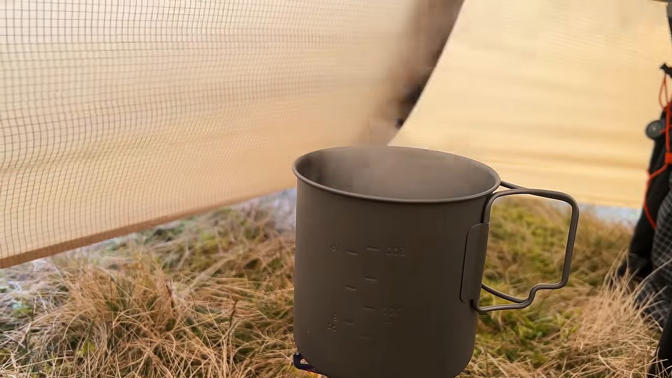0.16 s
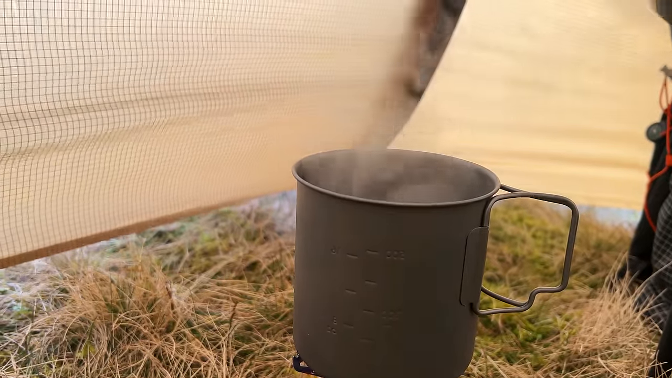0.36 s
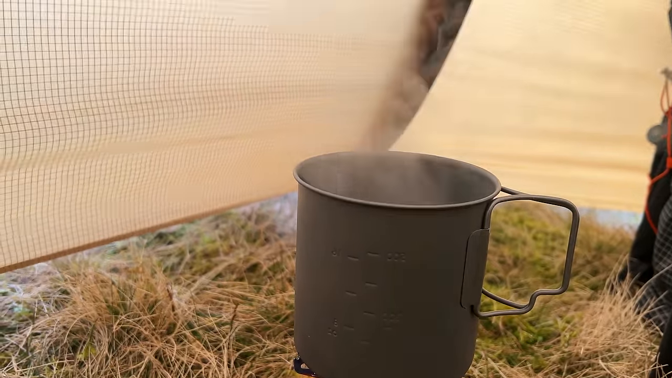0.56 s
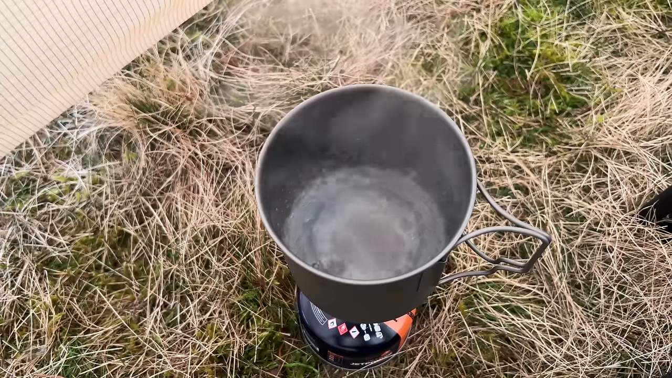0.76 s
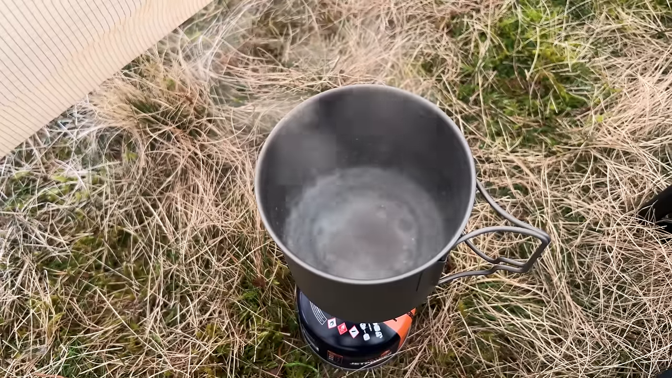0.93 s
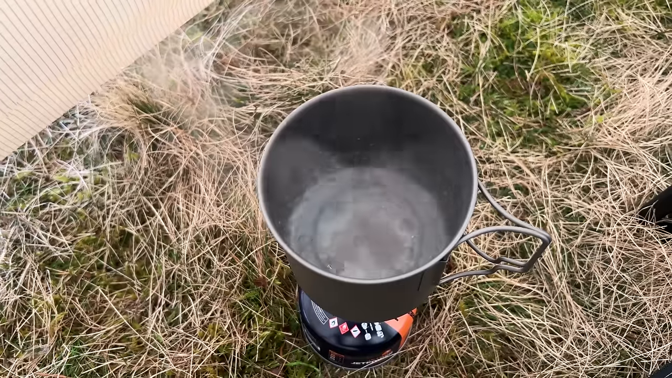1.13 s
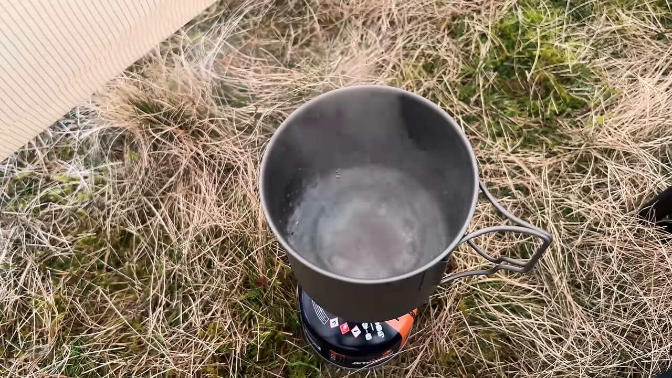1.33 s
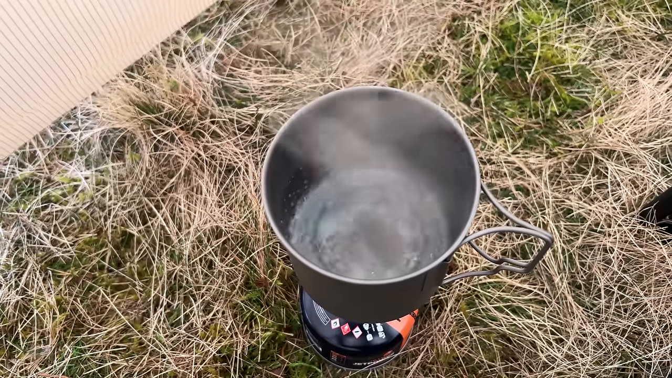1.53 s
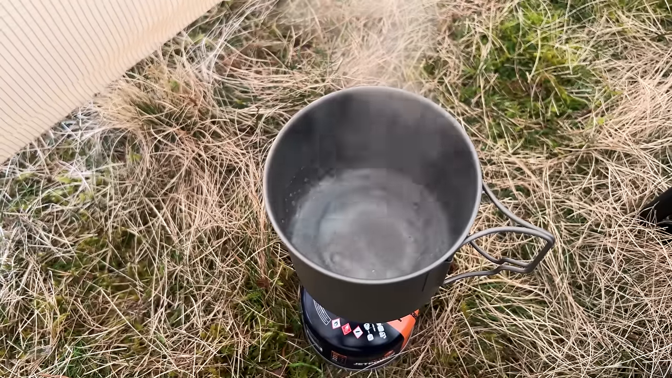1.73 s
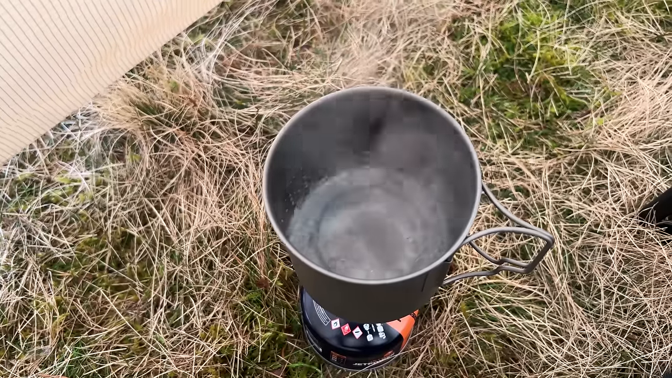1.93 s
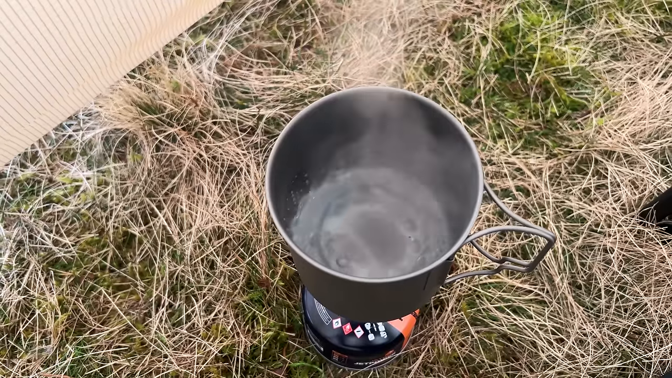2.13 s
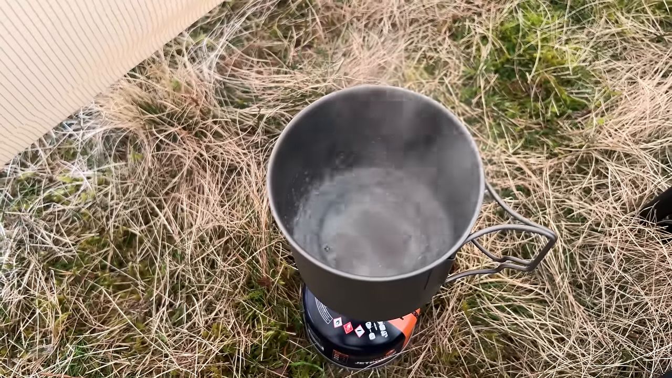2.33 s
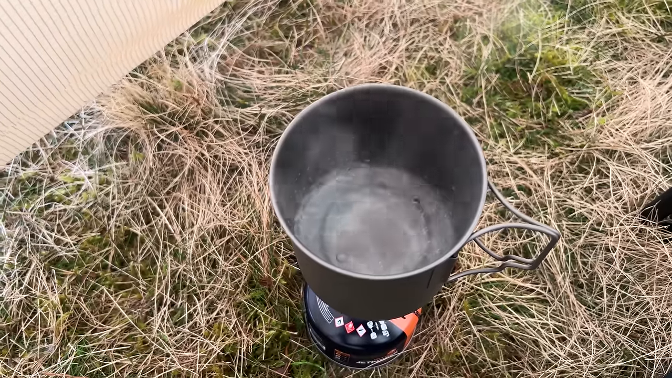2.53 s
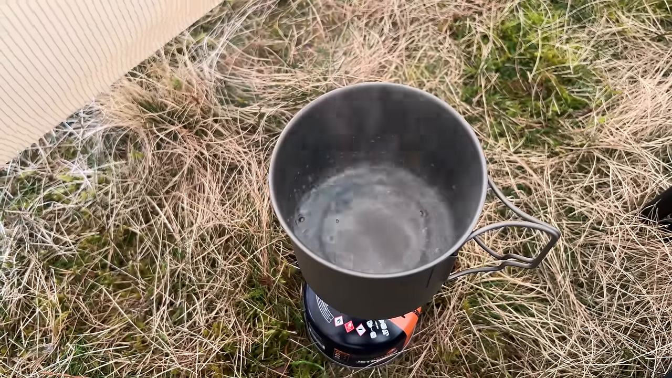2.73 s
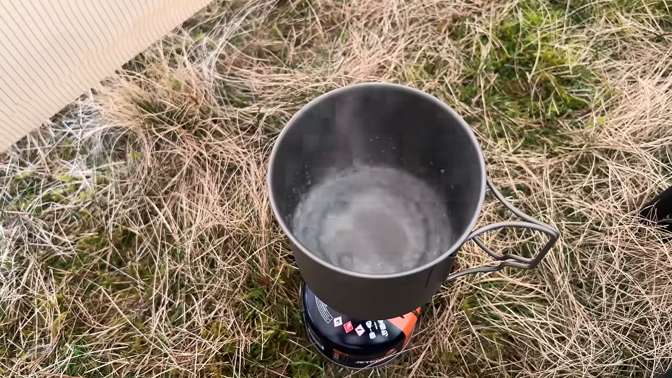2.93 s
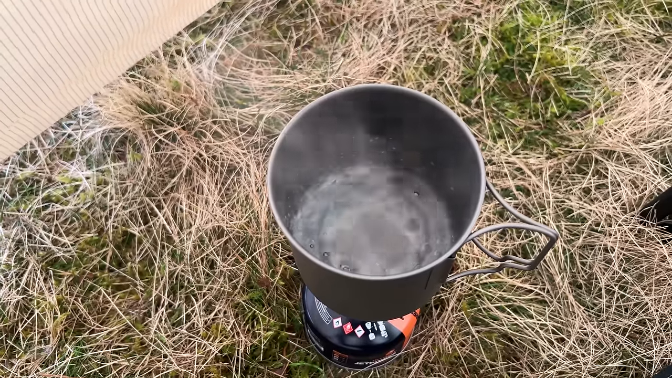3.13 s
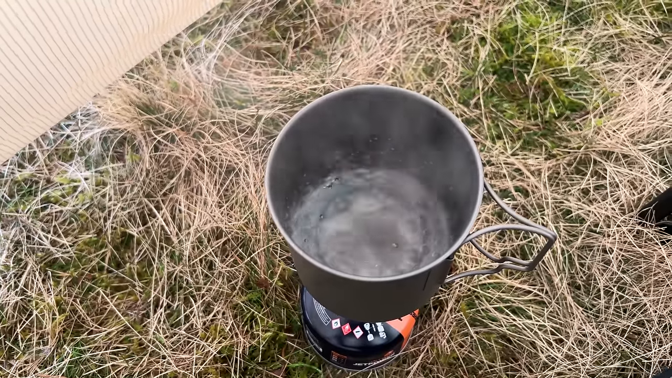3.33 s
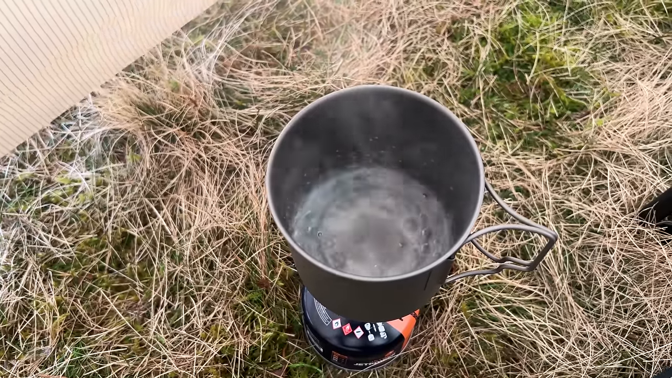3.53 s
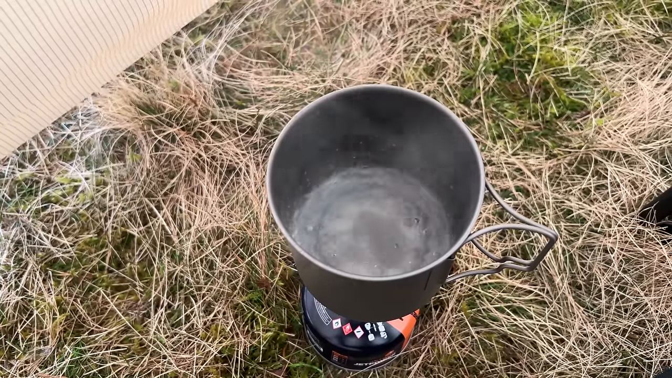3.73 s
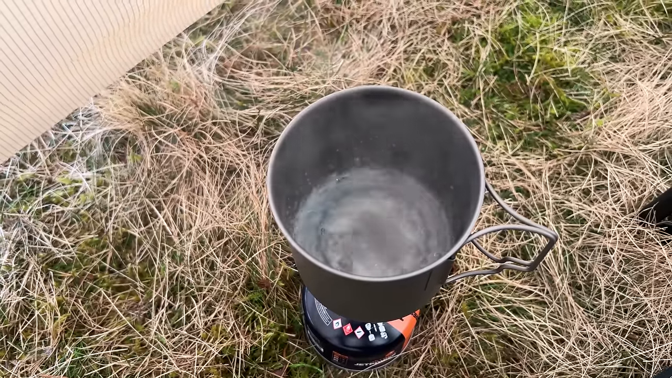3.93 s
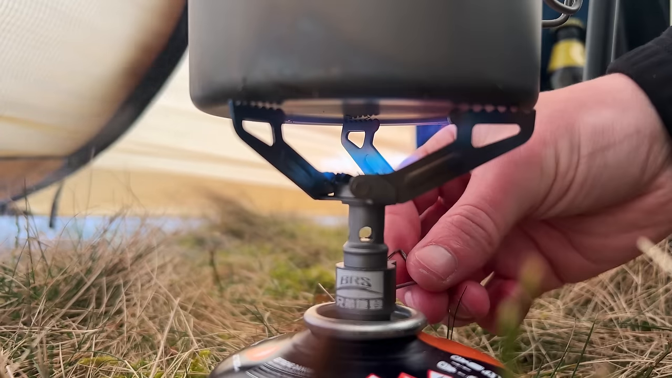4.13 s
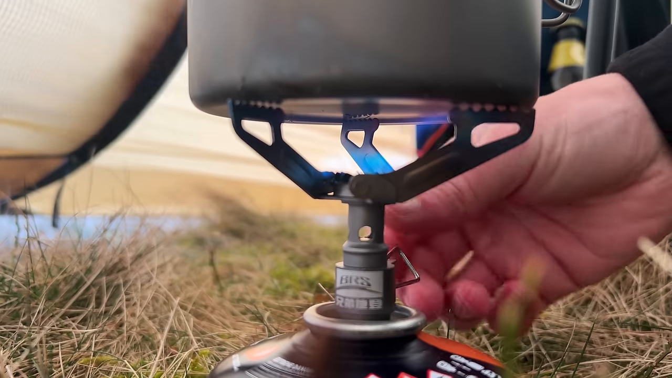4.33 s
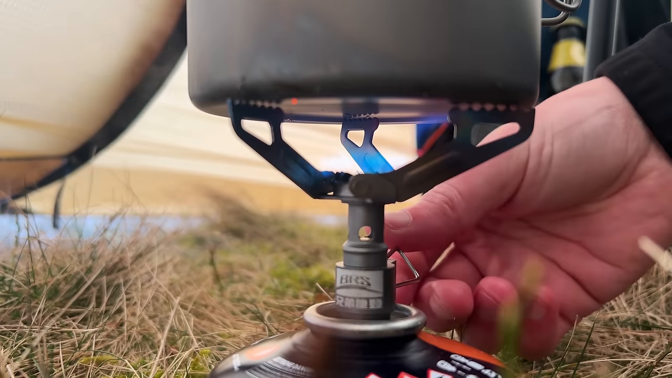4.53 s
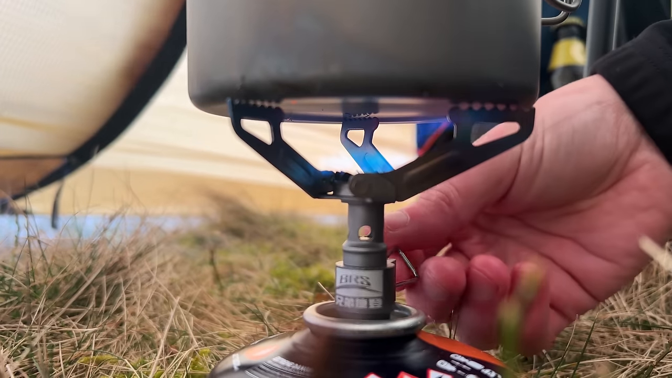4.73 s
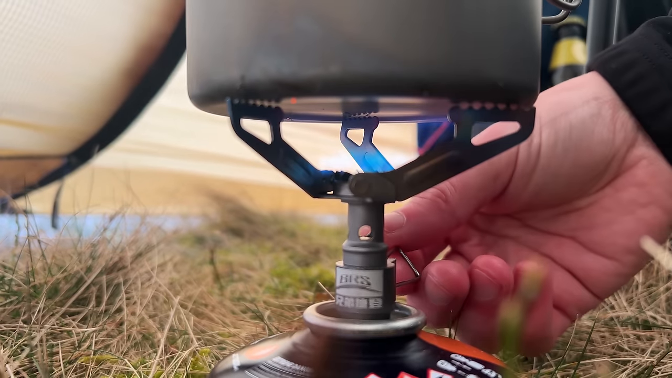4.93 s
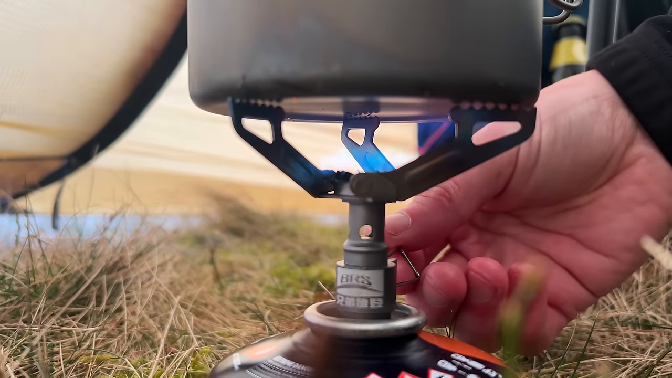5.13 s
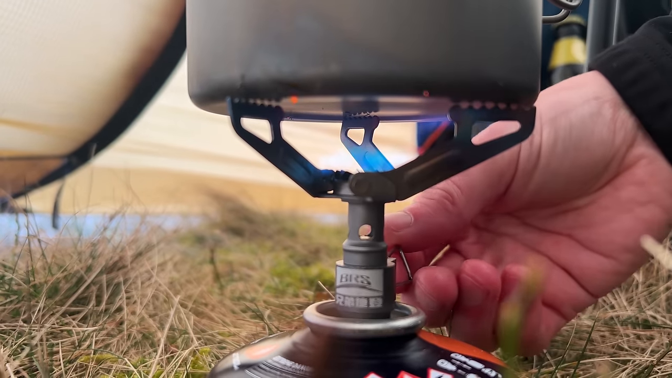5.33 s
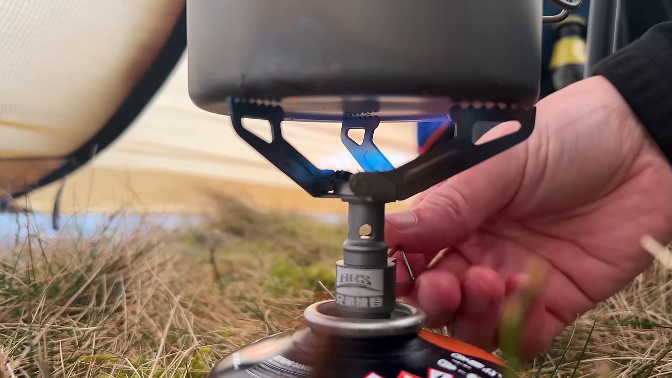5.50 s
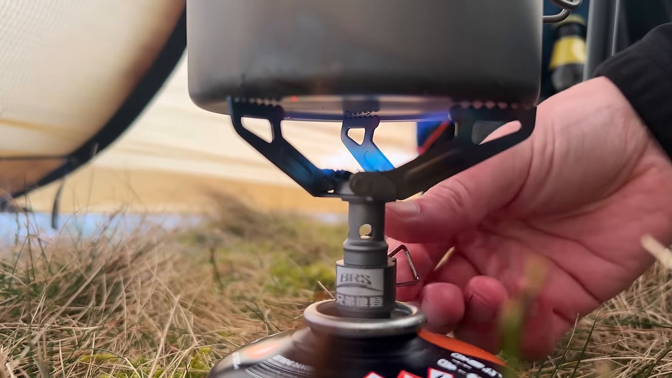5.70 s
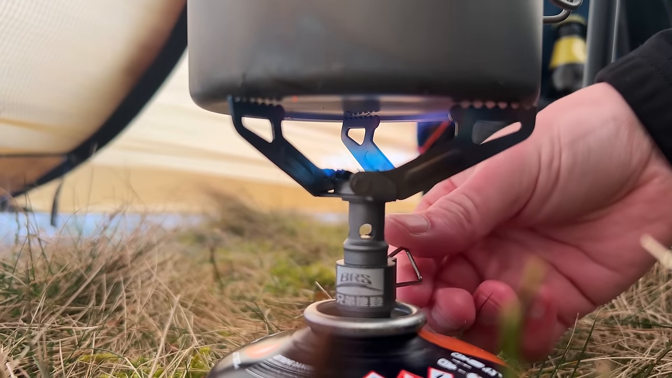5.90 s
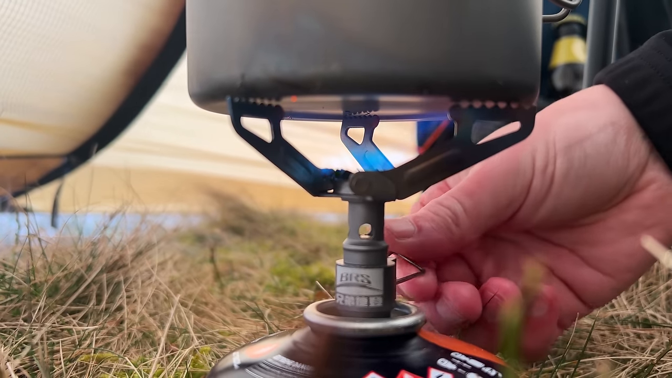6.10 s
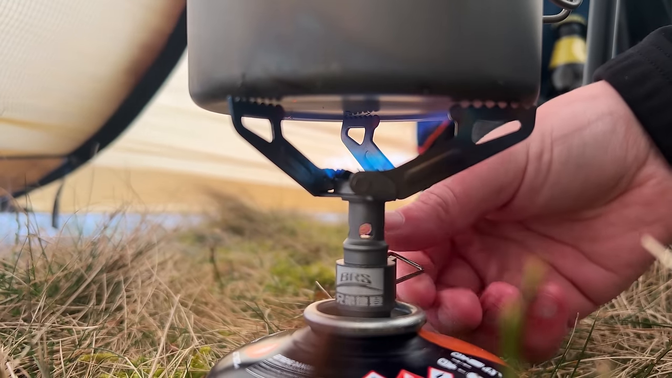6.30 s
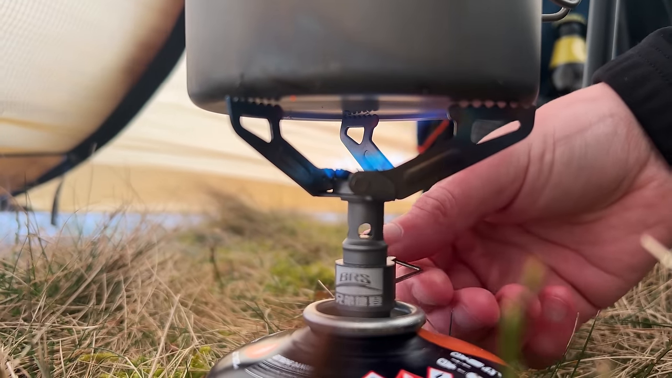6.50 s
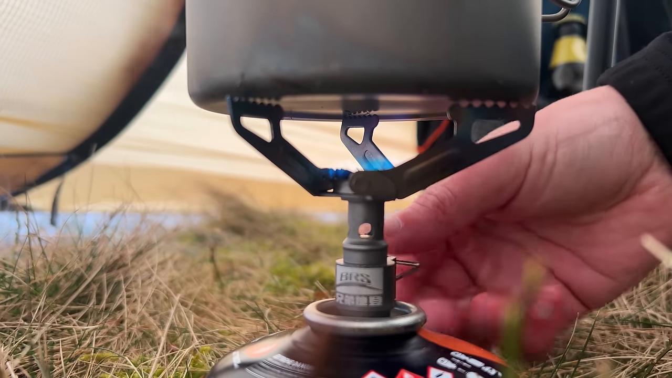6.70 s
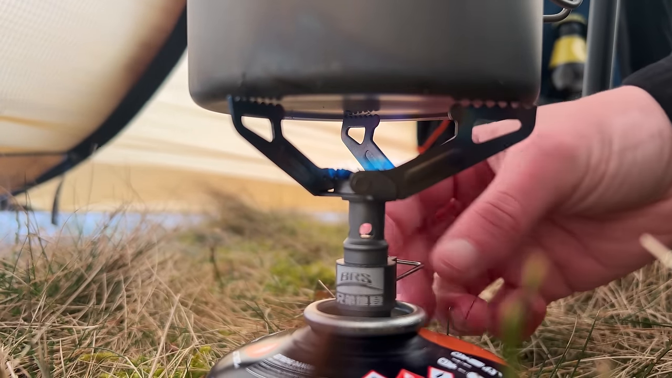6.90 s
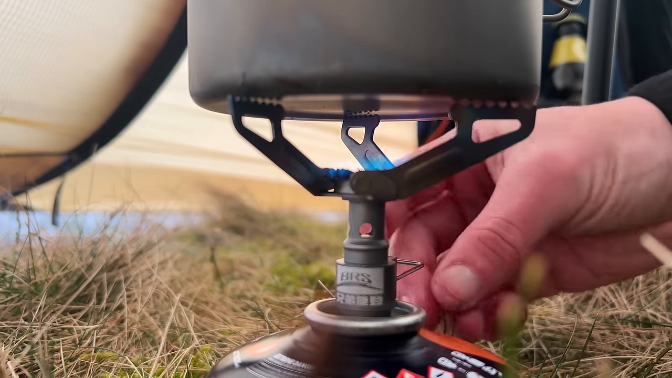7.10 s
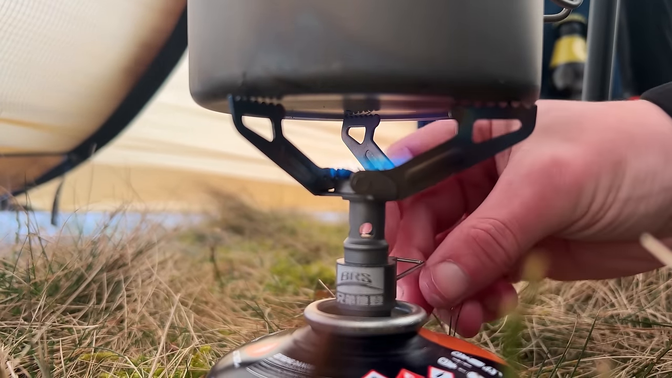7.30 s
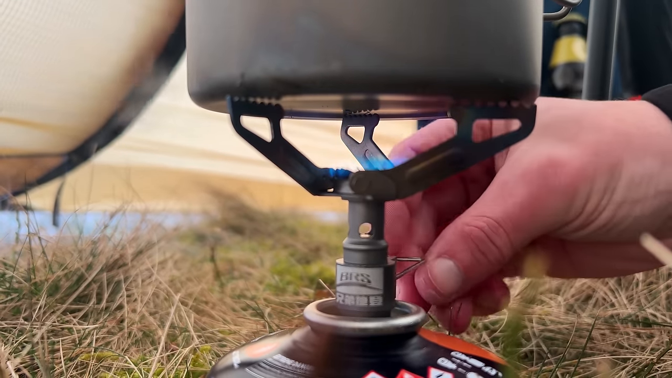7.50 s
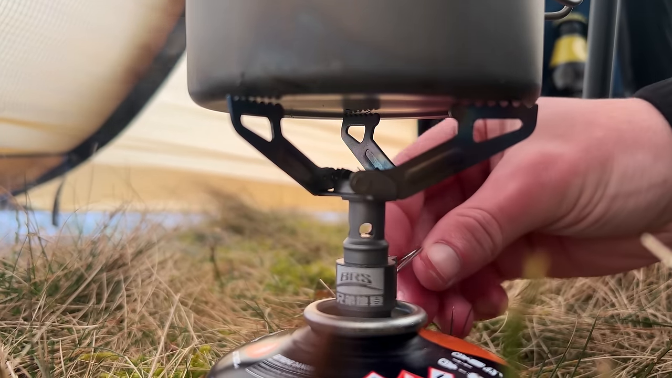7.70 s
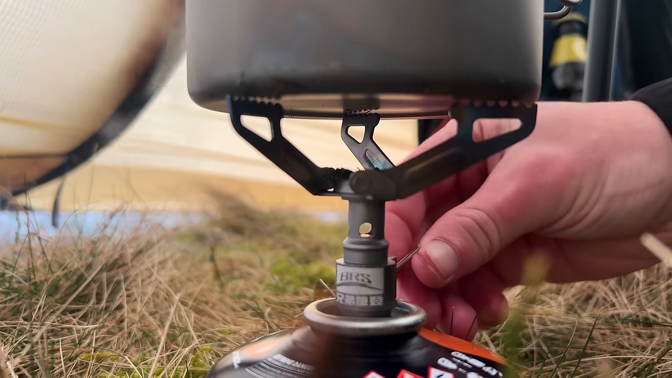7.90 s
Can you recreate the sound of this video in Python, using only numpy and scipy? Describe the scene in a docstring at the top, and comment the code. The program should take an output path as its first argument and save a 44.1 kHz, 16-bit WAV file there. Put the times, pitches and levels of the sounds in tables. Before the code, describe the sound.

A small gas stove burns outdoors, heard close in stereo with light, low wind behind. From 0 to about 0.5 s it is a steady soft roar with bright gas hiss beside a metal mug. By about 1 s the sound blends to above the mug: a hollow, resonant roar, less hiss, and a fine high sizzle of simmering bubbles that swells and ebbs until about 4 s. A faint tick comes near 4.2 s as the burner moves close; by 4.6 s the roar is louder and fuller, with short uneven low swells up to 5.7 s. Around 6.2 s the flame drops a step, and at 6.6 s falls sharply to a dull quiet rumble with thin hiss. From 7.3 s small metallic handle ticks and scrapes appear. At 7.6 s it sinks again, throbbing and puffing weakly, nearly out but still hissing at the end.

```python
"""Small gas stove under a mug

Outdoors, at three places in turn, each fading into the next: beside the mug, above its mouth, close to the burner.
The flame is coloured noise with short uneven swells; the gas jet hisses, the mug's hollow colours the roar.
Bubbles of the simmering water ring narrow bands, heard from above. A hand turns the flame down
until it throbs and nearly dies; the wire valve handle ticks in short noise bursts. Light wind lies behind.
"""
import sys
import numpy as np
from scipy import signal
from scipy.fft import rfft, irfft
from scipy.io import wavfile
from scipy.ndimage import uniform_filter1d

SR = 44100
rng = np.random.default_rng(int(sys.argv[2]) if len(sys.argv) > 2 else 0)


def generate_wav(signal):
    """Clip the signal to [-1, 1] and save it as 16-bit WAV at the path in sys.argv[1]."""
    frames = np.transpose(np.atleast_2d(signal))
    scaled = np.clip(frames, -1, 1) * 32767
    pcm = np.round(scaled).astype(np.int16)
    wavfile.write(sys.argv[1], SR, pcm)


N = 350578
SIZE = 1024  # samples in a spectral frame
HOP = SIZE // 4
HZ = np.fft.rfftfreq(SIZE, 1 / SR)
FRAME_S = np.arange(N // HOP + 5) * HOP / SR
T = np.arange(N) / SR

# listening place, crossfaded from one to the next:
# (time [s], place [0 beside the mug, 1 above its mouth, 2 close to the burner])
LISTENING_PLACE = [(0.25, 0), (0.7, 0.56), (1.1, 1.08), (1.5, 1.04), (3.8, 1.06), (4.17, 1.51),
                   (4.28, 1.82), (4.58, 2.12)]
# roar spectrum at each place, and of the low flame: (frequency [Hz], relative density [dB per Hz])
ROAR_BESIDE = [(25, -34), (55, -2.5), (130, -3), (300, -3), (700, -10.5), (980, -21), (1350, -14),
               (1800, -13.5), (2500, -22), (2900, -34), (9000, -62)]
ROAR_ABOVE = [(25, -33), (55, 6.5), (100, -2.5), (230, 1.5), (320, -3), (450, -6.5), (800, -13.5),
              (1570, -21), (2450, -26.5), (9000, -101)]
ROAR_CLOSE = [(25, -27), (50, -13), (90, 0), (330, 0.5), (720, -3.5), (950, -11), (1350, -13), (1780, -24),
              (2150, -21), (2420, -17), (3000, -25.5), (9000, -90)]
ROAR_LOW = [(25, 9.5), (50, 2.5), (130, 3), (300, -2.5), (550, -8.5), (900, -20), (1380, -18), (1590, -21),
            (1760, -40), (2400, -26), (9000, -85.5)]
# jet spectrum at each place, and with the valve nearly shut: (frequency [Hz], relative density [dB per Hz])
HISS_BESIDE = [(2000, -30.0), (3200, 1.5), (4200, 0.5), (5500, -0.5), (7300, 1.5), (8400, 3.5), (10000, -7),
               (11200, -14), (12500, -17), (15500, -17)]
HISS_ABOVE = [(2100, -27), (2500, -14), (2850, 0.0), (3500, -1.4), (3900, -6.5), (4300, -5.5), (4800, -8.5),
              (5300, -4.4), (5750, -6.8), (7600, -6.3), (8800, -4), (9300, -6), (9900, -13), (11200, -12.8),
              (12500, -21.1), (14000, -20.6), (15500, -16.7)]
HISS_CLOSE = [(2100, -26.8), (2900, -7.5), (3300, -4.3), (3700, -4), (4200, -4.8), (5800, -5.6),
              (7200, -1.6), (8000, -0.8), (8600, 0.6), (9600, -1.4), (10300, -8.5), (11500, -5.8),
              (12900, -14.0), (14500, -10.3), (15600, -13.9)]
HISS_LOW = [(2100, -25.0), (3000, -1.5), (4550, -6), (4850, 0), (5150, -4.8), (6250, -2.5), (6550, 0.3),
            (6850, -3), (8100, 1.2), (9600, 1.5), (10300, -6), (11400, -5), (12600, -11), (14400, -1.5),
            (15600, -2)]
# the two microphone ports at each place:
# (frequency [Hz], left over right [dB], coherence [0-1], left lead [rad])
PORTS_BESIDE = [(150, 0.9, 0.991, 0.1), (750, 5.3, 0.96, 0.1), (1000, -0.5, 0.91, 0.4),
                (1600, 6.7, 0.9, 0.3), (2450, -4.4, 0.85, 1.1), (3200, 1.2, 0.81, 1.5),
                (4100, 5.6, 0.59, 1.2), (5500, 5.0, 0.45, 2.4), (7300, 4.2, 0.6, 1.5),
                (8700, -1.9, 0.43, -0.5)]
PORTS_ABOVE = [(150, 1.3, 0.994, 0.05), (450, 0.5, 0.989, 0.1), (850, 1.6, 0.979, -0.19),
               (1100, -0.6, 0.99, -0.26), (1330, -0.2, 0.97, -0.51), (1510, -6.7, 0.72, -0.5),
               (1680, 3.0, 0.81, 1.09), (1920, -4.1, 0.95, 0.8), (2200, -2, 0.73, 0.8),
               (2400, -2, 0.61, 1.8), (2650, 1, 0.55, 1.0), (2900, -2, 0.8, 1.1), (3300, 1, 0.85, 0.7),
               (3900, 0, 0.42, -0.2), (4300, 2, 0.61, -0.7), (4800, 5, 0.35, -3.4), (5300, 8, 0.7, -3.1),
               (5800, 8, 0.38, -5.4), (7300, 2.4, 0.4, -4.1), (8700, -2.9, 0.7, -6.4)]
PORTS_CLOSE = [(170, 1.2, 0.995, 0.17), (350, 2.8, 0.975, 0.52), (550, 5.7, 0.995, 0.01),
               (1200, 2.8, 0.982, 0.07), (1620, 11.6, 0.58, 1.89), (2000, 0.4, 0.83, 0.5),
               (2200, 2, 0.89, 2.0), (2450, 1, 0.92, 2.0), (2650, -2, 0.9, 2.6), (2850, 0, 0.93, 3.2),
               (3050, 1.5, 0.82, 3.5), (3300, 3.6, 0.56, 4.9), (3900, 8.1, 0.39, 6.88),
               (5100, 2.0, 0.71, 6.38), (6300, -1.6, 0.64, 6.34), (7400, -0.9, 0.71, 6.49),
               (8500, -7.0, 0.26, 8.71)]
# strength of the flame, nudged up and then turned down by hand: (time [s], strength against normal [dB])
FLAME_STRENGTH = [(0.3, -1), (0.48, -2.5), (0.82, -2.5), (1.3, 0.5), (3.35, 0.3), (3.92, -2.5), (4.7, 0.5),
                  (5.07, 0), (5.16, 1), (5.7, 1.5), (6.16, -0.3), (6.24, -5), (6.555, -5), (6.645, -13.5),
                  (7.0, -15), (7.3, -14), (7.57, -15), (7.63, -22.5), (7.76, -25), (7.93, -21.5)]
# short uneven swells of the roar, and puffs as it starves: (middle [s], length [s], level [dB], pitch [Hz])
ROAR_SWELLS = [(0.137, 0.1, -30.5, 106), (0.22, 0.11, -36, 486), (0.295, 0.046, -29.5, 203),
               (0.48, .07, -30.5, 280), (1.115, 0.11, -36, 104), (1.376, 0.13, -35, 120),
               (1.716, 0.077, -34, 130), (2.658, .07, -33.5, 1080), (3.015, 0.066, -42, 140),
               (3.293, 0.063, -28.5, 85), (4.7, 0.11, -27.5, 110), (5.19, 0.088, -28, 99),
               (5.295, 0.24, -29, 332), (5.533, 0.13, -30, 90), (6.5, .08, -38, 90),
               (7.242, 0.053, -35.5, 243), (7.552, 0.027, -41, 200), (7.65, 0.032, -47, 550),
               (7.715, 0.0079, -44, 480), (7.718, .025, -43, 90), (7.777, 0.012, -38.5, 95),
               (7.832, 0.018, -38.5, 110), (7.884, .03, -40, 85)]
# jet hiss with a normal flame: (time [s], level [dB])
JET_LEVEL = [(0.3, -41), (2.0, -43.5), (4.15, -42), (4.42, -42.5), (4.75, -38), (5.4, -37.5), (5.7, -40.5),
             (5.95, -38), (6.9, -37), (7.35, -33), (7.55, -38), (7.7, -32)]
# lift of the sharp top of the hiss: (time [s], lift [dB])
HISS_SHARPNESS = [(2.8, -3.5), (4.1, 1), (4.3, -2), (4.56, -8), (4.78, -1), (5.45, 0.5), (5.72, -7),
                  (6.3, -2)]
# one reflection off mug or ground, beside the mug then above it: (extra path [m], share of amplitude [0-1])
NEAR_REFLECTIONS = [(0.417, 0.23), (0.307, 0.058)]
# distance of the reflection off the moving hand, at the burner: (time [s], extra path [m])
HAND_PATH = [(4.25, 0.32), (4.7, 0.27), (5.5, 0.26), (5.85, 0.279), (6.55, 0.268), (6.8, 0.31)]
# air resonances of the mug: (frequency [Hz], half-power width [Hz], relative level [dB])
MUG_MODES = [(1128, 260, 2), (1348, 154, -2), (1756, 115, -5.5), (1897, 240, -2), (2910, 380, -18)]
# surges of bubbles: (middle [s], half length [s], level above the mouth [dB], pitch [Hz])
SIMMER_SURGES = [(1.2, 0.65, -46.5, 6580), (1.84, 0.38, -45.5, 6350), (2.518, .25, -49, 6400),
                 (3.06, 0.45, -43.5, 6680), (3.58, 0.25, -48, 6350), (3.88, 0.35, -47, 6480)]
# modes of the mug's base: (frequency [Hz], half-power width [Hz], relative level [dB], left over right [dB])
BASE_MODES = [(3345, 230, 0, -1), (4340, 200, -7, -4), (5330, 300, -3, 7)]
# soft ticks and scrapes of the handle:
# (time [s], level before the port gains [dB], pitch [Hz], width [octaves], decay by 60 dB [s])
HANDLE_TICKS = [(4.168, -40, 3900, 0.35, .04), (7.278, -46, 5400, .16, .04), (7.344, -52, 5300, .45, .1),
                (7.367, -54, 3200, .7, .05), (7.425, -51, 6700, .25, 0.092), (7.483, -43, 3400, 0.67, 0.03),
                (7.698, -50, 4600, 0.91, 0.042), (7.711, -52, 4500, 1, .035), (7.725, -54, 6400, .25, .07),
                (7.824, -53, 5800, .25, 0.056), (7.900, -55, 2900, .8, .08)]
# spectrum of open air and light wind: (frequency [Hz], relative density [dB per Hz])
AIR_SPECTRUM = [(20, -29), (55, -1.5), (110, 0.5), (300, -19), (550, -8), (950, -16), (1400, -11.5),
                (1900, -19.5), (4000, -28), (8000, -25), (11000, -56), (16000, -41)]
# level of the open air, which lulls at the end: (time [s], level [dB])
BREEZE_LEVEL = [(7.3, -47), (7.66, -47.5), (7.9, -52)]

ROAR_DB = (-26.96, -28.46, -21.96)  # normal flame: beside the mug, above it, at the burner
MUG_DB = -32  # over the mouth, with a normal flame
SIMMER_DB = -50  # above the mouth, between the surges
ROAR_FOLLOWS, JET_FOLLOWS, MUG_FOLLOWS = 0.88, 1.32, 0.84  # dB of rise for one dB of flame
DULL_DB = (-4, -16.5)  # flame strength where its colour starts to dull, and is fully dull
STARVED_DB = (-18, -21)  # flame strength where it starts to throb, and throbs fully
HAND_SHARE = 0.21  # amplitude of the hand's reflection against the direct hiss
SHARP_HZ, SHARP_WIDTH_HZ = 9000, 1000
BUBBLES_PER_S, BUBBLE_SPREAD_DB = 3000, 2.2  # so many, so alike, that they merge into a sizzle
TICK_TOP_HZ = 8000
EDGE_HZ = 15800  # upper band limit of the microphone


def flame(ports, flutter, flutter_db=0.5, puff_db=3.0, sway_db=0.21, patchy_db=1.0,
          throb_hz=80, throb_width_hz=45, throb_db=8):
    """Turbulent burning: a low, swaying roar that dulls as the valve closes, and throbs when starved of gas."""
    colour_db = colour(ROAR_BESIDE, ROAR_ABOVE, ROAR_CLOSE, ROAR_LOW)
    colour_db = colour_db + patchy_db * patches(size=8, count=8)
    throb_band = np.exp(-((HZ - throb_hz) / throb_width_hz) ** 2)
    throb = sunk(FRAME_S, STARVED_DB)[:, None] * throb_band
    roar = turbulence(colour_db + throb_db * throb, *ports)
    flutter_depth_db = flutter_db + puff_db * sunk(T, STARVED_DB)
    unrest_db = flutter_depth_db * flutter + sway_db * wander(rate_hz=1.9)
    return roar * gain_of(here(ROAR_DB) + ROAR_FOLLOWS * burn(T) + unrest_db)


def roar_swells(ports, octaves=0.58):
    """Short uneven swells of the flame's roar, mostly low, and puffs as it starves: bands of noise."""
    power, level = 0, 0
    for middle, length, db, pitch in ROAR_SWELLS:
        band = evened(np.exp(-(np.log2((HZ + 1) / pitch) / octaves) ** 2))
        frame_power = np.exp(-(2 * (FRAME_S - middle) / length) ** 2)[:, None]
        power = power + gain_of(db) ** 2 * frame_power * band
        level = level + gain_of(db) * np.exp(-0.5 * (2 * (T - middle) / length) ** 2)
    return level * turbulence(10 * np.log10(power + 1e-30), *ports)


def jet(ports, flutter, flutter_db=0.5, sputter_db=0.76, patchy_db=1.7):
    """The gas jet hisses, swaying with the flame and sputtering finely; a near reflection ripples its colour."""
    wavenumber = 2 * np.pi * HZ / 343  # speed of sound in m/s
    echoes = [*NEAR_REFLECTIONS, (at(HAND_PATH, FRAME_S)[:, None], HAND_SHARE)]
    ripples = []
    for path, share in echoes:
        # power of the direct sound plus one delayed copy
        ripples.append(10 * np.log10(1 + share ** 2 + 2 * share * np.cos(wavenumber * path)))
    sharp_band = np.exp(-((HZ - SHARP_HZ) / SHARP_WIDTH_HZ) ** 2)
    sharp_db = at(HISS_SHARPNESS, FRAME_S)[:, None] * sharp_band
    colour_db = colour(HISS_BESIDE, HISS_ABOVE, HISS_CLOSE, HISS_LOW) + by_place(*ripples) + sharp_db
    hiss = turbulence(colour_db + patchy_db * patches(size=12, count=16), *ports)
    unrest_db = flutter_db * flutter + sputter_db * wander(rate_hz=120)
    return hiss * gain_of(at(JET_LEVEL, T) + JET_FOLLOWS * burn(T) + unrest_db)


def mug(ports, flutter, flutter_db=0.5, sputter_db=0.8, beside=0.23):
    """The sputtering flame rings the air in the mug in a few broad modes, heard mostly over its mouth."""
    power = sum(gain_of(db) ** 2 / 2 ** ((2 * (HZ - hz) / width) ** 2) for hz, width, db in MUG_MODES)
    ring = turbulence(10 * np.log10(power + 1e-9), *ports)
    unrest_db = flutter_db * flutter + sputter_db * wander(rate_hz=75)
    nearness = here([beside, 1, 0])
    return ring * nearness * gain_of(MUG_DB + MUG_FOLLOWS * burn(T) + unrest_db)


def simmer(sizzle_width_hz=560, sizzle_db=10, sizzle_left_db=8.5):
    """Steam bubbles collapse on the base: a sizzle of drifting pitch, over fainter modes of the thin metal."""
    pitch = at([(middle, hz) for middle, _, _, hz in SIMMER_SURGES], T)
    sizzle = pings(pitch, sizzle_width_hz, sizzle_db, sizzle_left_db)
    base = sum(pings(*mode) for mode in BASE_MODES)
    return evened(sizzle + base) * here([0, 1, 0]) * surging()


def surging():
    """Amplitude of the simmer: each surge swells and ebbs in a smooth arch above a faint steady fizz."""
    power = gain_of(SIMMER_DB) ** 2
    for middle, length, db, _ in SIMMER_SURGES:
        arch = np.cos(np.pi / 2 * np.clip((T - middle) / length, -1, 1)) ** 2
        power = power + (gain_of(db) * arch) ** 2
    return np.sqrt(power)


def pings(hz, width_hz, db, balance_db):
    """A dense rain of collapsing bubbles rings one resonance, whose pitch may drift."""
    where = np.flatnonzero(rng.random(N) < BUBBLES_PER_S / SR)
    size = gain_of(BUBBLE_SPREAD_DB * np.minimum(rng.exponential(1, len(where)), 5))
    # phase in turns: a part common to both ports and a smaller part of each port's own
    phase = rng.random(len(where)) + 0.5 * rng.random((2, len(where)))
    clicks = np.zeros((2, N), complex)
    clicks[:, where] = size * np.exp(2j * np.pi * phase)
    # a double pole gives the half-power width; the carrier then lifts the ringing to its pitch
    keep = np.exp(-np.pi * width_hz / np.sqrt(np.sqrt(2) - 1) / SR)
    envelope = signal.lfilter([1], [1, -2 * keep, keep ** 2], clicks)
    carrier = np.exp(2j * np.pi * np.cumsum(hz * np.ones(N)) / SR)
    ring = (envelope * carrier).real
    return evened(ring) * gain_of(db + balance_db * np.array([[0.5], [-0.5]]))


def ticks(rise_s=0.0012, left_db=6.0, right_db=-4.0):
    """The wire handle ticks and scrapes softly under the fingers: a short burst in a metallic band."""
    t = np.arange(SIZE * 4) / SR
    hz = np.fft.rfftfreq(len(t), 1 / SR) + 1
    out = np.zeros((2, N))
    for start, db, pitch, octaves, t60 in HANDLE_TICKS:
        band = np.exp(-0.5 * (np.log2(hz / pitch) / octaves) ** 2)
        band = band / (1 + (hz / TICK_TOP_HZ) ** 10)
        burst = evened(irfft(rfft(rng.standard_normal((2, len(t)))) * band))
        tick = burst * np.minimum(t / rise_s, 1) * gain_of(-60 * t / t60)
        part = out[:, round(start * SR):][:, :len(t)]
        part += gain_of(db) * tick[:, :part.shape[1]]
    return out * gain_of([[left_db], [right_db]])


def air(gust_db=0.3, left_db=2.1, alike_below_hz=800):
    """Light wind in the open: a soft rumble, alike in both ports, under a diffuse rustle."""
    likeness = 1 / (1 + (HZ / alike_below_hz) ** 2)
    wash = turbulence(read(AIR_SPECTRUM), left_db, likeness)
    return wash * gain_of(at(BREEZE_LEVEL, T) + gust_db * wander(rate_hz=5.9))


def turbulence(colour_db, balance_db, link):
    """Two-port noise of steady unit level whose colour may change from frame to frame."""
    a, b, c, d = rng.standard_normal((4, len(FRAME_S), len(HZ)))
    left = a + 1j * b
    # the right port shares the linked part of the left and adds noise of its own
    right = np.conj(link) * left + np.sqrt(np.maximum(1 - abs(link) ** 2, 0)) * (c + 1j * d)
    size, lean = gain_of(colour_db), gain_of(balance_db)
    size = size / np.linalg.norm(size, axis=-1, keepdims=True) / np.sqrt(1 + lean ** 2)
    spectra = np.array([left * lean, right]) * size
    _, noise = signal.istft(spectra, nperseg=SIZE, noverlap=SIZE - HOP, time_axis=-2, freq_axis=-1)
    return evened(noise[:, :N])


def stove_ports(treble_hz=9300, lag_s=0.00029, in_phase_hz=8500):
    """Balance [dB] and complex coherence of the stove; in the top treble a fixed lag links the ports."""
    tables = PORTS_BESIDE, PORTS_ABOVE, PORTS_CLOSE
    balance_db = by_place(*(read(p) for p in tables))
    likeness = by_place(*(read(p, axis=2) for p in tables))
    lead = np.angle(by_place(*(np.exp(1j * read(p, axis=3)) for p in tables)))
    top = np.clip((HZ - treble_hz) / 1000 + 0.5, 0, 1)
    lagged = np.exp(-2j * np.pi * (HZ - in_phase_hz) * lag_s)
    link = (1 - top) * likeness * np.exp(1j * lead) + top * lagged
    return (1 - top) * balance_db, link


def colour(beside, above, close, turned_down):
    """Spectrum in dB as one place fades into the next and the valve closes: frames x bins."""
    low = sunk(FRAME_S, DULL_DB)[:, None]
    return (1 - low) * by_place(read(beside), read(above), read(close)) + low * read(turned_down)


def burn(t):
    """Strength of the flame in dB at the times t."""
    return at(FLAME_STRENGTH, t)


def sunk(t, limits_db):
    """How far the flame has sunk from the first strength to the second, 0-1."""
    return np.clip((burn(t) - limits_db[0]) / (limits_db[1] - limits_db[0]), 0, 1)


def here(values):
    """Blends three values, one for each place, as one place fades into the next."""
    return np.interp(at(LISTENING_PLACE, T), [0, 1, 2], values)


def by_place(beside, above, close):
    """Blends three rows of bins as one place fades into the next: frames x bins."""
    place = np.clip(at(LISTENING_PLACE, FRAME_S), 0, 2)[:, None]
    rows = enumerate((beside, above, close))
    return sum(np.maximum(1 - abs(place - k), 0) * row for k, row in rows)


def wander(rate_hz, slowest_hz=2):
    """Slow chance of rms one, with changes above slowest_hz that weaken beyond rate_hz."""
    hz = np.fft.rfftfreq(N, 1 / SR)
    spectrum = rfft(rng.standard_normal(N)) * (hz > slowest_hz) / (1 + (hz / rate_hz) ** 2)
    return evened(irfft(spectrum, N))


def patches(size, count):
    """A random field of rms one, smooth over size frames and count bins."""
    field = rng.standard_normal((len(FRAME_S), len(HZ)))
    field = uniform_filter1d(field, size, axis=0)
    return evened(uniform_filter1d(field, count, axis=1))


def gain_of(db):
    """Decibels to amplitude."""
    return 10 ** (np.asarray(db) / 20)


def evened(x):
    """Scales to an rms of one."""
    return x / np.sqrt(np.mean(x ** 2) + 1e-20)


def at(curve, t):
    """Reads a curve at the times t."""
    return np.interp(t, *np.transpose(curve))


def read(points, axis=1):
    """Reads one column of a table on a log-frequency axis."""
    columns = np.transpose(points)
    return np.interp(np.log(HZ + 1), np.log(columns[0]), columns[axis])


def scene():
    """One flutter of the flame moves roar, jet and mug together."""
    ports = stove_ports()
    flutter = wander(rate_hz=30, slowest_hz=8.5)
    stove = flame(ports, flutter) + roar_swells(ports) + jet(ports, flutter)
    return stove + mug(ports, flutter) + simmer() + ticks() + air()


def record(dry):
    """The microphone sheds the deepest rumble; then the band limit."""
    highpass = signal.butter(4, 45, "highpass", fs=SR, output="sos")
    thinned = signal.sosfilt(highpass, dry)
    lowpass = signal.firwin(511, EDGE_HZ, window=("kaiser", 9), fs=SR)
    return signal.oaconvolve(thinned, lowpass[None], "same")


dry = scene()
out = record(dry)
generate_wav(out)
```